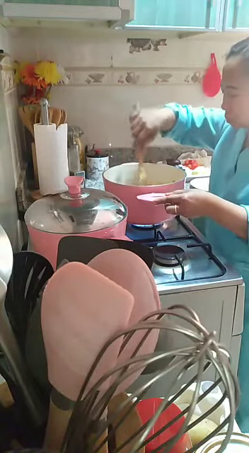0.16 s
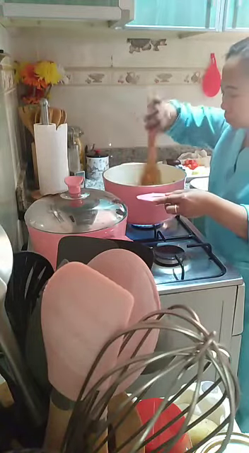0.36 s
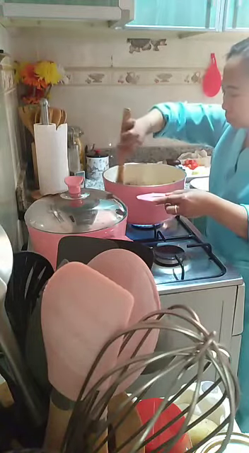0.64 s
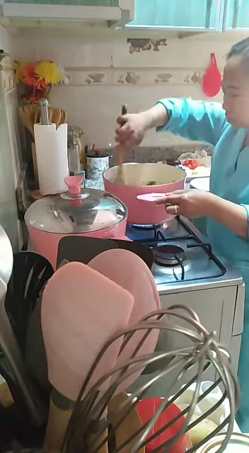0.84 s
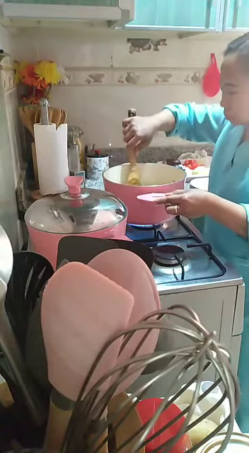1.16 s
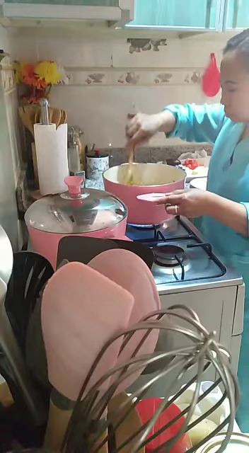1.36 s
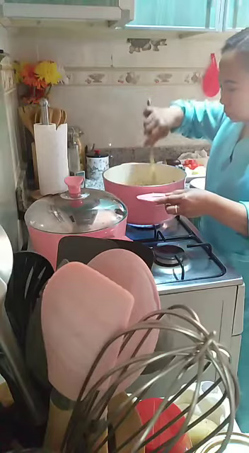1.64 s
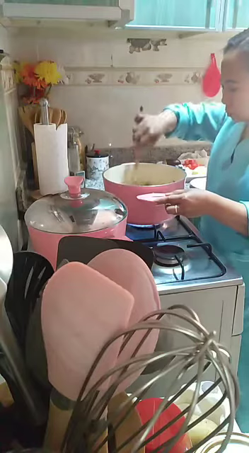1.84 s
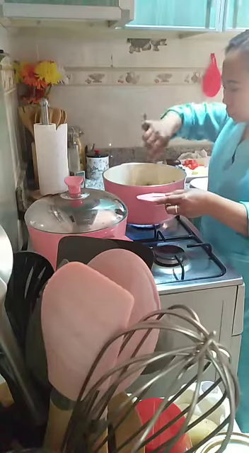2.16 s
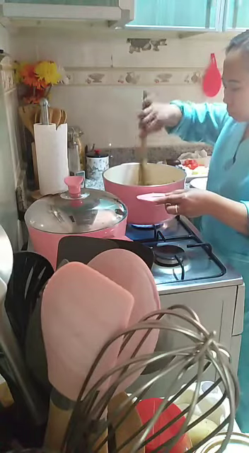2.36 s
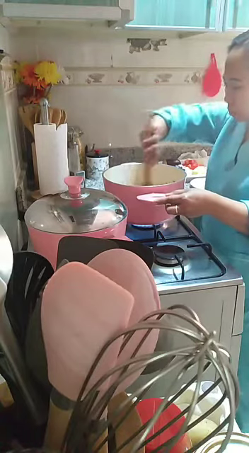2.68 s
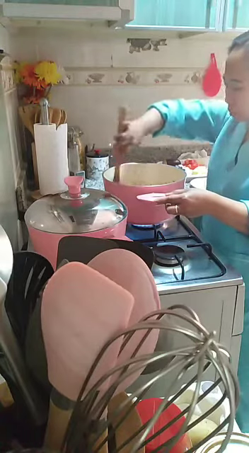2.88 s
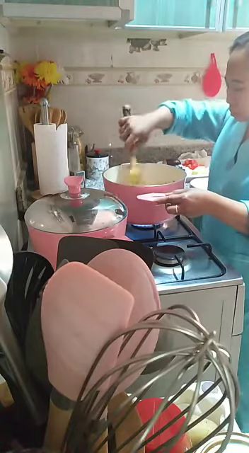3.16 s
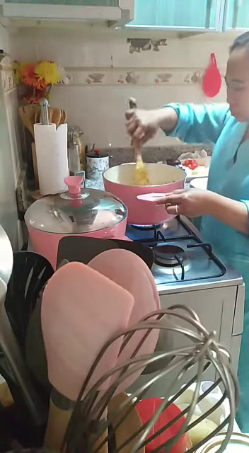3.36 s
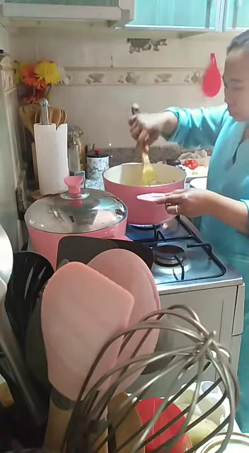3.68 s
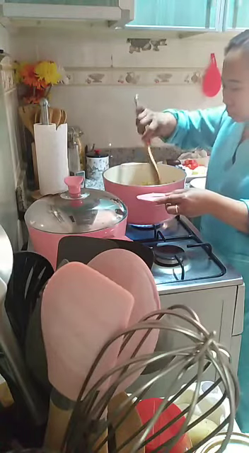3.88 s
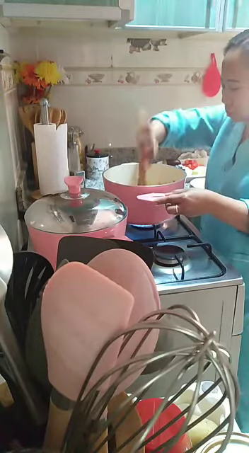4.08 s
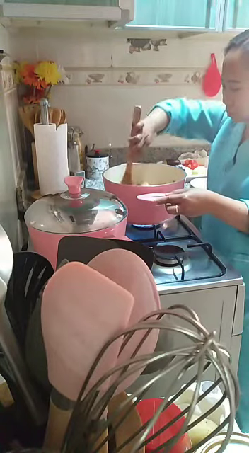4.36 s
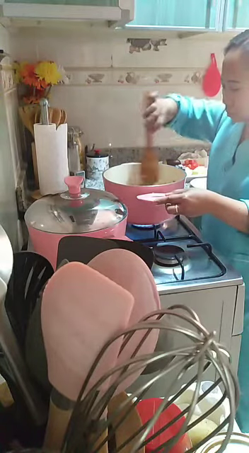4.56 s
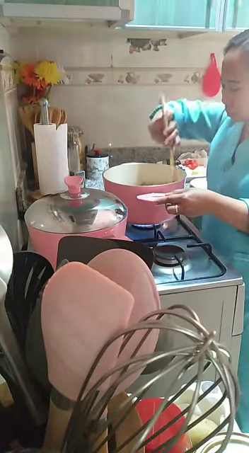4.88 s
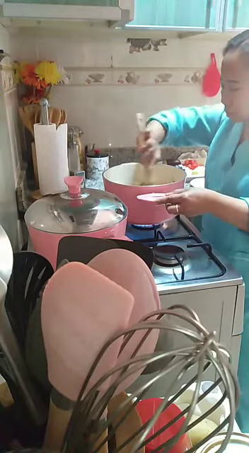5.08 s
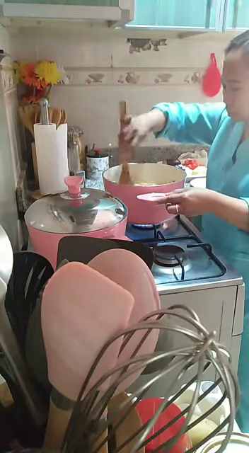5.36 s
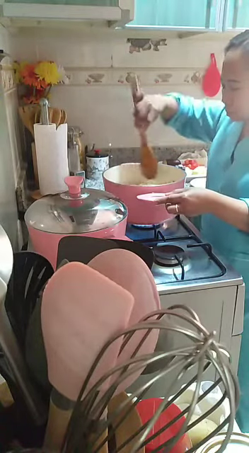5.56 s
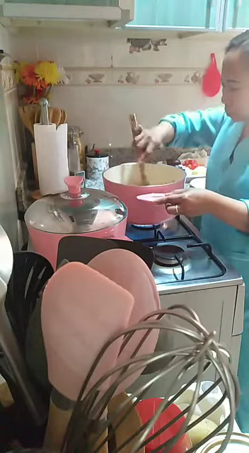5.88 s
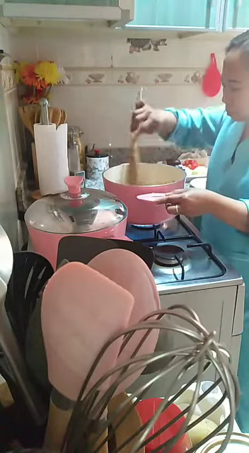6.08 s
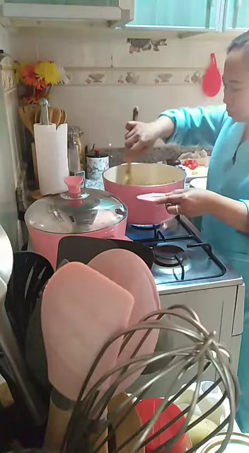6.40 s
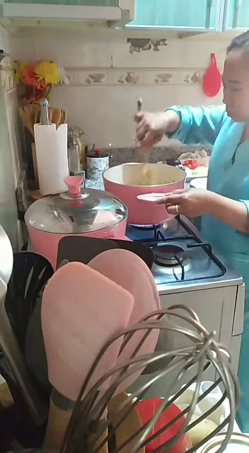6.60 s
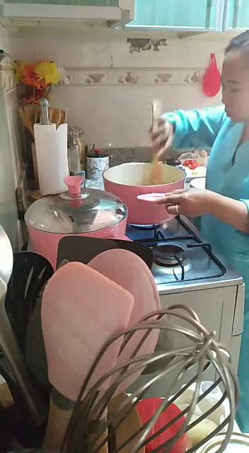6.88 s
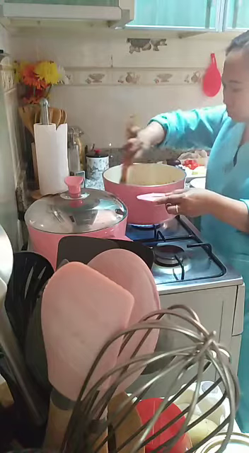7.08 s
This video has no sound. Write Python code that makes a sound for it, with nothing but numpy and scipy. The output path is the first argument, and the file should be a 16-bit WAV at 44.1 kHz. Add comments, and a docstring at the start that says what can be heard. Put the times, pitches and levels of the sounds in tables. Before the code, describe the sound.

Food sizzles in a pot in fading surges while a wooden spoon scrapes and knocks against it.

```python
"""A small tiled kitchen: food fries in an enamelled pot on a gas burner.
Each turn of a wooden spoon lays wet food on hot metal: the sizzle flares with bursting bubbles and
a high fizz, then sinks to thin squeaks of steam. The spoon scrapes the pot and knocks its modes
into ringing, the pot bumps on its grate, and the flame rushes underneath."""
import sys
import numpy as np
from scipy import signal
from scipy.fft import rfft, irfft, next_fast_len
from scipy.io import wavfile
from scipy.ndimage import uniform_filter1d, map_coordinates

SR = 44100
rng = np.random.default_rng(int(sys.argv[2]) if len(sys.argv) > 2 else 0)


def wav_out(sig):
    """Save sig, one row per channel (or a flat mono array), as 16-bit PCM at SR to the path in sys.argv[1]."""
    wavfile.write(sys.argv[1], SR, np.round(np.clip(np.atleast_2d(sig).T, -1, 1) * 32767).astype(np.int16))


N = 319284

# Pot modes, damped by food and hand. Each row: frequency in Hz, level in dB, width in Hz.
POT_MODES = [(587, 2.5, 45), (681, -2.5, 59), (914, -1.5, 68), (1118, -13, 55), (1611, 0, 76),
             (2110, 1.5, 66), (2243, -3, 44), (2465, 1.5, 82), (2804, 5.5, 37), (3086, 1.5, 41),
             (3680, -9.5, 140), (3915, 1, 38), (4440, -12, 32), (4910, -7, 53), (5540, -7, 49),
             (6470, -9, 84)]
# Stereo balance of sizzle and whistles. Each row: frequency in Hz, left minus right in dB.
STEAM_PAN = [(2000, 16), (5500, -5.5), (6800, -3.5), (7600, 12), (8500, 13), (10000, 13), (11200, 3),
             (14000, 12)]


def amp(db):
    """Decibels to gain."""
    return 10 ** (np.asarray(db) / 20)


def unit(x):
    """Scale so the mean of the channels has rms 1."""
    return x / np.sqrt(np.mean(np.atleast_2d(x).mean(0) ** 2) + 1e-20)


def along(points, hz):
    """Interpolate (Hz, value) points on a log axis."""
    knots_hz, values = np.transpose(points)
    return np.interp(np.log(hz + 1), np.log(knots_hz), values)


def wobble(rate_hz):
    """Smooth random curve with rate_hz knots a second."""
    knots = rng.standard_normal(int(N * rate_hz / SR) + 4)
    return map_coordinates(knots, [np.arange(N) * rate_hz / SR])


def pan(db):
    """Stereo gains for a left-minus-right level."""
    gains = amp(np.array([np.atleast_1d(db), -np.atleast_1d(db)]) / 2)
    return gains / np.sqrt(np.mean(gains ** 2, 0))


def filtered(x, response):
    """Apply the gain response(hz)."""
    size = next_fast_len(N + SR // 4)
    return irfft(rfft(x, size) * response(np.fft.rfftfreq(size, 1 / SR)), size)[..., :N]


def coloured(x, spectrum):
    """Shape by (Hz, dB) points, at rms 1."""
    return unit(filtered(x, lambda hz: amp(along(spectrum, hz))))


def add(track, start_s, sound):
    """Mix a sound into the track."""
    start = max(round(start_s * SR), 0)
    track[:, start:start + sound.shape[1]] += sound[:, :max(N - start, 0)]


def late_left(x, samples):
    """The sound arrives later on the left."""
    return np.array([np.pad(x[0], (samples, 0))[:N], x[1]])


def kitchen(x, wet_db):
    """Direct sound plus reverberation off the tiles, different in each channel."""
    # Room decay. Each row: frequency in Hz, T60 in seconds.
    decay = [(200, 0.68), (700, 0.25), (2500, 0.26), (7000, 0.2), (14000, 0.72)]
    hz, t, noise = signal.stft(rng.standard_normal((2, SR // 2)), SR, nperseg=256)
    tail = signal.istft(noise * amp(-60 * t / along(decay, hz)[:, None]), SR, nperseg=256)[1]
    tail[:, :SR // 250] = 0  # 4 ms pre-delay
    response = amp(wet_db) * tail / np.linalg.norm(tail[0])
    response[:, 0] = 1
    return signal.fftconvolve(np.atleast_2d(x), response, axes=1)[:, :x.shape[-1]]


def roaming(x, wet_db, ripple_db):
    """Frying moves about the pot, so the reverberation and the ripple from its wall keep changing."""
    track, hop = np.zeros((2, N)), SR // 3
    padded, fade = np.pad(x, (hop, 2 * hop)), np.sin(np.linspace(0, np.pi, 2 * hop))
    for start in range(0, N + hop, hop):
        piece = kitchen(np.pad(fade * padded[start:start + 2 * hop], (0, hop)), wet_db)
        add(track, (start - hop) / SR, piece[:, max(hop - start, 0):])
    spectra = signal.stft(track, nperseg=1024)[2]
    ripple = uniform_filter1d(rng.standard_normal(spectra.shape), size=3, axis=1)
    ripple = uniform_filter1d(ripple, size=8, axis=2)
    gain = amp(ripple_db * np.minimum(ripple / ripple.std(), 1.5))
    return signal.istft(spectra * gain, nperseg=1024)[1][:, :N]


def pops(per_s, scatter_db):
    """Impulses at random times, a few larger than the rest."""
    when, size, polarity = rng.random((int(per_s * N / SR), 3)).T
    heights = amp(scatter_db * np.minimum(-np.log(1 - size), 5)) * np.sign(polarity - .5)
    return unit(np.bincount((when * N).astype(int), heights, N))


def blips(per_s, life_s, scatter_db, low_hz, high_hz):
    """Very short tones at random times, each bending slightly in pitch."""
    when, pitch, length, size, bend = rng.random((int(per_s * N / SR), 5)).T[:, :, None]
    t = np.arange(SR // 60) / SR
    length_s = np.minimum(life_s * 2 ** (2 * length - 1), t[-1])
    age = np.minimum(t / length_s, 1)
    hz = low_hz + (high_hz - low_hz) * pitch
    phase = 2 * np.pi * hz * t * (1 + 0.015 * (bend - .5) * age)
    gain = amp(scatter_db * np.minimum(-np.log(1 - size), np.pi))
    tones = gain * np.sin(np.pi * np.sqrt(age)) * np.sin(phase)
    index = (when * N).astype(int) + np.arange(len(t))
    return unit(np.bincount(index.ravel(), tones.ravel(), N)[:N])


def chirr(length_s, first_hz, last_hz, width_hz, slips_per_s=900):
    """Random slips or puffs, each ringing briefly on a pitch glide, under one swell."""
    stroke = np.linspace(0, 1, int(length_s * SR))
    slips = rng.standard_normal(len(stroke)) * (rng.random(len(stroke)) < slips_per_s / SR)
    age = np.pi * width_hz * length_s * stroke
    chatter = signal.fftconvolve(slips, age * np.exp(-age))[:len(stroke)]
    phase = 2 * np.pi * np.cumsum(first_hz + (last_hz - first_hz) * stroke) / SR
    return np.sin(np.pi * stroke) * unit(chatter * np.sin(phase))[None]


def burner():
    """The gas flame's steady rush, coloured by standing waves, nearly mono in the bass."""
    # Flame spectrum. Each row: frequency in Hz, density in dB.
    spectrum = [(20, -33), (45, -12), (75, -9), (100, -2.5), (170, 0.5), (220, -0.5), (290, -2.5),
                (420, -4), (700, -3.5), (850, -10.5), (1800, -12), (2700, -16), (3600, -28), (14000, -53)]
    # Standing waves between stove and walls. Each row: centre in Hz, width in Hz, gain in dB.
    standing_waves = [(100, 12, 2.5), (119.6, 12.5, 4), (164, 11, 5), (181, 15.6, 5.5), (261, 25, 2.5),
                      (294, 5.8, 13.5), (370, 32, 5), (461, 31, 6), (510, 9.6, 6.5), (548, 11.5, -4),
                      (716, 53, 6), (885, 30, 5.5), (1058, 9.7, 8.5), (1303, 17, 5.5), (2600, 114, 10.5)]
    # Stereo balance. Each row: frequency in Hz, left minus right in dB.
    balance = [(60, -4), (170, 0), (280, -0.5), (380, -7.5), (680, -0.5), (820, 4.5), (1500, -0.5),
               (4000, 3.5)]
    # Stereo likeness. Each row: frequency in Hz, left-right correlation.
    coherence = [(50, 0.96), (220, 0.96), (400, 0.63), (700, 0.47), (1100, 0.14), (3000, 0)]

    def mid_side(hz):
        angle = np.arccos(np.clip(along(coherence, hz), -1, 1)) / 2
        return np.array([np.cos(angle), np.sin(angle)])

    def colour(hz):
        lift_db = sum(db / (1 + (2 * (hz - centre_hz) / width_hz) ** 2)
                      for centre_hz, width_hz, db in standing_waves)
        return amp(along(spectrum, hz) + lift_db) * pan(along(balance, hz))

    mid, side = filtered(rng.standard_normal((2, N)), mid_side)
    rush = unit(filtered(np.array([mid + side, mid - side]), colour))
    return amp(-51 + .6 * wobble(14)) * rush


def bumps():
    """The pot shifts on the grate with a soft low boom."""
    # Each row: peak time in seconds, level in dB, pitch in Hz, swell in seconds.
    booms = [(5.081, -32.5, 178, 0.027), (5.119, -39.5, 227, 0.018), (5.76, -43, 283, 0.013),
             (5.779, -35, 245, 0.023), (5.828, -38, 270, 0.0049), (6.84, -43, 217, 0.011)]
    track, t = np.zeros((2, N)), np.arange(-SR // 10, SR // 10) / SR
    for peak_s, db, hz, swell_s in booms:
        boom = np.sin(2 * np.pi * (hz * t + rng.random())) / np.cosh(2.2 * t / swell_s)
        add(track, peak_s + t[0], amp(db) * pan(2.9) * boom)
    return track


def scrapes():
    """The spoon's edge sticks and slips over the enamel; the pitch slides with the stroke."""
    # Each row: start in seconds, length in seconds, level in dB, first and last pitch in Hz, width in Hz.
    strokes = [ (0.579, 0.074, -52.5, 2008, 2075, 320), (.85, 0.065, -51, 1170, 1233, 259),
               (0.861, 0.08, -52, 3220, 3290, 160), (0.874, 0.18, -53, 4430, 4310, 500),
               (0.953, 0.096, -60, 3700, 3600, 140), (0.966, 0.077, -61, 2950, 2940, 130),
               (1.12, 0.11, -59.5, 1495, 1654, 430), (1.776, 0.23, -59, 2375, 2340, 180),
               (2.09, 0.093, -48, 2120, 2120, 110), (2.111, 0.12, -46.5, 2490, 2500, 260),
               (2.108, 0.086, -52, 1637, 1580, 90), (2.111, 0.13, -51, 3300, 3550, 700),
               (2.168, 0.13, -50, 2754, 3060, 350), (2.719, 0.19, -54.5, 4700, 4800, 400),
               (2.901, 0.23, -59, 4520, 4400, 350), (4.121, 0.048, -48, 2283, 2370, 260),
               (5.276, .14, -52.5, 2460, 2765, 330), (5.753, 0.057, -58, 1233, 1243, 380),
               (5.76, 0.14, -62, 3070, 3480, 500), (5.788, 0.062, -53, 1496, 1547, 400),
               (5.849, 0.031, -49.5, 4040, 4020, 110), (5.851, 0.19, -59, 2950, 2973, 330)]
    track = np.zeros((1, N))
    for start_s, length_s, db, first_hz, last_hz, width_hz in strokes:
        add(track, start_s, amp(db) * chirr(length_s, first_hz, last_hz, width_hz))
    return pan(6.6) * kitchen(track, wet_db=10)


def click(t60_s=0.033):
    """Wood meets enamel: a short burst of dry noise."""
    # Click spectrum. Each row: frequency in Hz, density in dB.
    spectrum = [(1500, -22), (2600, 5), (4000, -23), (4900, -35), (5800, -4), (7100, 5), (8200, -8),
                (9400, -7), (11500, -36)]
    t = np.arange(SR // 2) / SR
    colour = amp(along(spectrum, np.fft.rfftfreq(len(t), 1 / SR)))
    noise = unit(irfft(rfft(rng.standard_normal(len(t))) * colour, len(t)))
    return noise * amp(-60 * t / t60_s) / 2


def knocks():
    """Spoon on pot: place and firmness choose which modes ring; bare wood wakes the high ones."""
    # Each row: start in seconds, level in dB, centre in Hz, spread in octaves, hardness in dB,
    # left minus right in dB, detuning in percent, reverberation in dB, click level in dB.
    blows = [ (.322, -49, 1170, 0.27, -39.5, -5.5, 8, 4, -70), (.555, -28, 2100, .07, -3, 9, -4, 7.5, -46),
             (.562, -28, 2130, 0.12, -2, 4.5, -4, -0.5, -35),
             (.592, -33.5, 2120, 0.12, -10, -4, -5.5, 5.5, -60),
             (1.744, -19, 648, 0.18, -62, -2.5, -0.5, 1, -70),
             (1.742, -35, 1120, 0.07, -55, 16, -1.5, 8.5, -70),
             (1.866, -39, 1100, 0.11, -45, 16, -5.5, -4, -70), (2.053, -31, 920, .11, -4, 11, 3, 6, -44),
             (2.062, -19, 2090, 0.39, -23, 10, 1.5, 3.5, -16),
             (2.070, -31.5, 2560, 0.29, -21, -2, 1.5, 4, -15.5),
             (2.092, -26.5, 1950, .5, -13, 6, -0.5, 10, -30),
             (2.452, -42, 590, 0.16, -46, -14, 0.5, -5, -70), (2.556, -29, 765, 0.12, -3, -2, 2.5, 2, -25),
             (3.205, -43, 716, 0.081, -40, 9, 1, 7, -70), (4.098, -24, 2370, 0.15, -18, 8, 1, -3, -50),
             (4.143, -39, 2400, 0.068, -32, 6, 2, -2, -60),
             (4.207, -37.5, 2485, .07, -35, 17, 5.5, -5, -60),
             (4.675, -39.5, 1120, .07, -30, 16, 8, -11, -70),
             (4.740, -44.5, 725, 0.17, -40, -5, 5.5, 7, -70),
             (5.018, -43.5, 575, .12, -40, -13, -5, -6, -70)]
    track, t = np.zeros((2, N)), np.arange(SR // 2) / SR
    hz, mode_db, width_hz = np.transpose(POT_MODES)[:, :, None]
    age = 2 * np.pi * width_hz * t
    swell = width_hz * age ** 2 * np.exp(-age)  # food cushions the blow, so each mode builds up
    for start_s, db, centre_hz, spread_oct, hard_db, pan_db, detune_pct, wet_db, click_db in blows:
        band = np.exp(-.5 * (np.log2(hz / centre_hz) / spread_oct) ** 2)
        drive = band / band.max() + amp(hard_db) * (hz / 4000) ** 2
        envelopes = amp(mode_db) * drive * swell
        pitch_hz = hz * (1 + detune_pct / 100)
        ring = np.sum(envelopes * np.sin(2 * np.pi * (pitch_hz * t + rng.random(hz.shape))), 0)
        ring /= np.linalg.norm(envelopes, axis=0).max()
        add(track, start_s, amp(db) * pan(pan_db) * kitchen(ring, wet_db))
        add(track, start_s, amp(click_db) * pan(2.5) * kitchen(click(), wet_db=6))
    return track


def plops():
    """Soft lumps of food and thick bubbles plop faintly throughout."""
    lumps = blips(per_s=22, life_s=0.012, scatter_db=3, low_hz=950, high_hz=1900)
    return amp(-66.5) * pan(3.9) * unit(kitchen(lumps, wet_db=7))


def bubbles(spatter_db):
    """Single bubbles of juice ping below the sizzle, louder while the food is wet."""
    pings = blips(per_s=130, life_s=0.016, scatter_db=3.2, low_hz=2898, high_hz=5805)
    return amp(-10 + .84 * spatter_db) * pan(1.6) * unit(kitchen(pings, wet_db=6.5))


def whistles():
    """Steam sputters from under the food through a gap that briefly holds its size."""
    # Each row: start in seconds, length in seconds, level in dB, pitch in Hz, width in Hz.
    pockets = [(4.032, 0.2, -50, 8120, 110), (4.397, 0.057, -49, 6100, 450), (4.423, 0.2, -46.5, 8600, 320),
               (5.79, 0.097, -51, 8080, 140), (6.081, 0.082, -51.5, 8130, 120)]
    track = np.zeros((1, N))
    for start_s, length_s, db, pitch_hz, width_hz in pockets:
        add(track, start_s, amp(db) * chirr(length_s, pitch_hz, pitch_hz, width_hz))
    return filtered(kitchen(track, wet_db=11), lambda hz: pan(along(STEAM_PAN, hz)))


def spatter(level_db):
    """Larger bubbles burst where wet food smears over the metal; the pot rings hollowly with them."""
    # Burst spectrum. Each row: frequency in Hz, density in dB.
    spectrum = [(600, -58), (1150, 2), (1900, -11), (2800, 8.5), (3600, 0.5), (4500, 6), (5500, 21.5),
                (7000, -34)]

    def hollow(hz, floor_db=-5):
        return amp(floor_db) + sum(1 / (1 + ((hz - centre_hz) / width_hz) ** 4)
                                   for centre_hz, _, width_hz in POT_MODES)

    bursts = coloured(filtered(pops(per_s=600, scatter_db=3), hollow), spectrum)
    heard = roaming(bursts, wet_db=5, ripple_db=6)
    return amp(level_db + 2.5 * wobble(30)) * pan(0.63) * unit(heard)


def fizz(level_db):
    """A fluttering high fizz with very short, faint tones flickering at about 10-14 kHz."""
    # Fizz spectrum. Each row: frequency in Hz, density in dB.
    spectrum = [(8000, -31), (10500, 8.5), (12000, -2), (14300, -18)]
    hiss = coloured(pops(per_s=3100, scatter_db=1.5), spectrum)
    short_tones = blips(per_s=220, life_s=0.007, scatter_db=3, low_hz=9600, high_hz=13800)
    flutter_db = 0.38 * wobble(45) + wobble(10)
    heard = roaming(hiss + short_tones, wet_db=4.5, ripple_db=2.5)
    return amp(level_db + flutter_db) * pan(7.1) * unit(heard)


def sizzle(level_db):
    """Fierce frying is a dense crackle; as it calms, steam squeaking through gaps in the food leads."""
    # Crackle and steam spectra. Each row: frequency in Hz, density in dB.
    crackle_spectrum = [(3000, -34), (4800, -17), (5700, -6.5), (6900, 5.5), (7400, 3.5), (8200, 8.5),
                        (9500, -2.5), (11000, -12.5), (12500, -20), (14300, -22.5)]
    steam_spectrum = [(3000, -40), (5000, -21), (5700, 5), (7000, -3.5), (7700, 9), (8350, 6), (9300, 1.5),
                      (10200, 2.5), (11500, -51), (14300, -38)]
    # Crackle against steam. Each row: sizzle level in dB, crackle's share of the power.
    crackle_share = [(-46, .12), (-36, .33), (-27, .72)]
    share = np.interp(level_db, *np.transpose(crackle_share))
    crackle = coloured(pops(per_s=5000, scatter_db=1), crackle_spectrum)
    steam = blips(per_s=750, life_s=0.015, scatter_db=2.9, low_hz=5270, high_hz=12350)
    frying = np.sqrt(share) * crackle + np.sqrt(1 - share) * coloured(steam, steam_spectrum)
    heard = roaming(frying, wet_db=3, ripple_db=4.2)
    heard = filtered(heard, lambda hz: pan(along(STEAM_PAN, hz)))
    flutter_db = .3 * wobble(60) + .6 * wobble(25)
    return amp(level_db + flutter_db) * unit(heard)


def flare(peak_s, hold_s, rise_db_per_s, fall_db_per_s, sag_db_per_s=0):
    """Power envelope of one flare: attack, sagging hold, release."""
    age_s = np.arange(N) / SR - peak_s
    drop_db = (rise_db_per_s * np.maximum(-age_s, 0)
               + sag_db_per_s * np.clip(age_s, 0, hold_s)
               + fall_db_per_s * np.maximum(age_s - hold_s, 0))
    return amp(-np.minimum(drop_db, 100)) ** 2


def stirring():
    """Sizzle, spatter and fizz levels in dB: resting food plus every push and spit."""
    # Resting food quietens as it dries. Each row: time in seconds, sizzle in dB.
    resting = [(0, -42), (2.2, -35.5), (2.55, -41), (3.8, -43), (4.05, -48.5), (4.8, -51.5), (5.6, -54),
               (7.2, -55.5)]
    # The spoon lays wet food on hot metal. Each row: peak time in seconds, hold in seconds,
    # rise in dB per second, then sizzle, spatter and fizz in dB.
    pushes = [(0.0, 0.039, 177, -27, -45, -36.5), (0.61, 0.25, 122, -35.5, -52, -47),
              (0.88, 0.13, 85, -27, -39.5, -41.5), (1.298, 0.15, 96, -35, -55.5, -47.5),
              (1.724, 0.18, 120, -30, -47.5, -42.5), (2.191, 0.027, 175, -29.5, -39, -46),
              (2.75, 0.21, 124, -33, -47, -46), (2.996, 0.18, 148, -29, -45.5, -43.5),
              (3.472, 0.41, 177, -45.5, -67, -52.5), (4.28, 0.048, 177, -40.5, -65, -52.5),
              (4.392, 0.14, 300, -42, -54.5, -57), (4.986, 0.27, 145, -37, -58, -53),
              (5.296, 0.08, 200, -31, -47.5, -46.5), (5.762, 0.25, 330, -37, -56, -49),
              (6.44, 0.2, 121, -38, -72, -47), (6.8, 0.063, 177, -51, -64, -72),
              (7.04, 0.13, 177, -51, -66, -61)]
    # Release after a push. Each row: time in seconds, fall in dB per second.
    falls = [(0, 31.5), (7.2, 175)]
    # Trapped steam escapes. Each row: peak time in seconds, level in dB.
    spits = [(2.60, -34.5), (3.93, -40.5), (4.42, -35), (4.70, -42.5), (4.92, -44), (5.745, -37),
             (5.81, -35), (6.62, -35.5), (7.235, -40.5)]
    resting_db = np.interp(np.arange(N) / SR, *np.transpose(resting))
    power = amp([resting_db, np.full(N, -63), resting_db - 13]) ** 2  # sizzle, spatter, fizz
    for peak_s, hold_s, rise_db_per_s, *levels_db in pushes:
        fall_db_per_s = np.interp(peak_s, *np.transpose(falls))
        envelope = flare(peak_s, hold_s, rise_db_per_s, fall_db_per_s, sag_db_per_s=11)
        power += amp(levels_db)[:, None] ** 2 * envelope
    for peak_s, db in spits:
        power[0] += amp(db) ** 2 * flare(peak_s, hold_s=0, rise_db_per_s=900, fall_db_per_s=270)
    return 10 * np.log10(power)


def scene():
    """The stove: stirring drives sizzle, fizz, spatter and bubbles."""
    sizzle_db, spatter_db, fizz_db = stirring()
    pot = sizzle(sizzle_db) + fizz(fizz_db) + spatter(spatter_db)
    pot = pot + scrapes() + whistles() + bubbles(spatter_db) + plops()
    return late_left(pot, samples=20) + late_left(knocks() + bumps() + burner(), samples=9)


def record(dry):
    """Brick-wall low-pass."""
    top_hz = 14350
    return filtered(dry, lambda hz: hz < top_hz)


dry = scene()
out = record(dry)
wav_out(out)
```